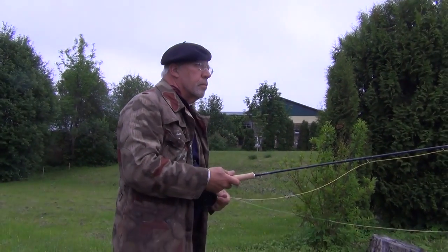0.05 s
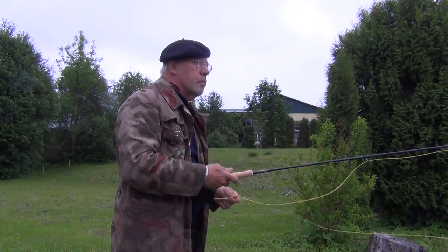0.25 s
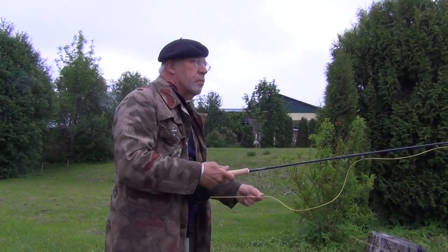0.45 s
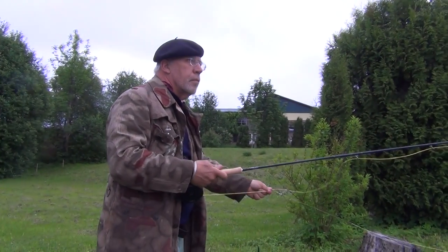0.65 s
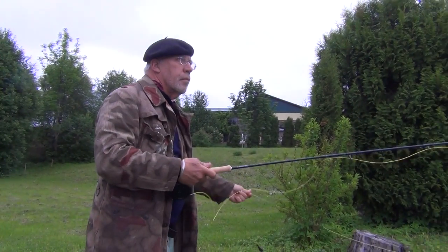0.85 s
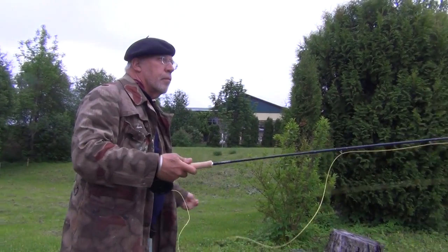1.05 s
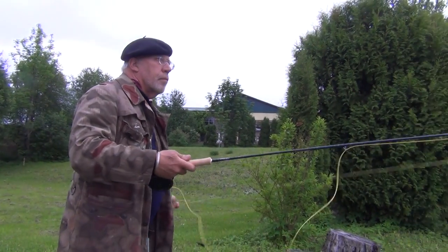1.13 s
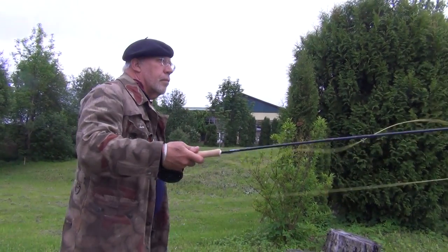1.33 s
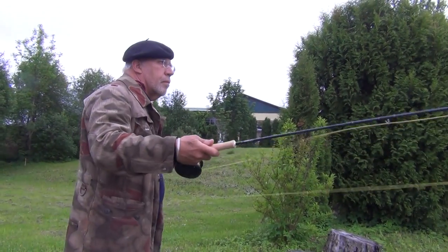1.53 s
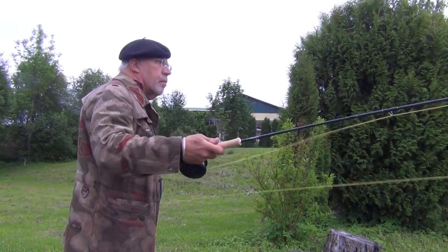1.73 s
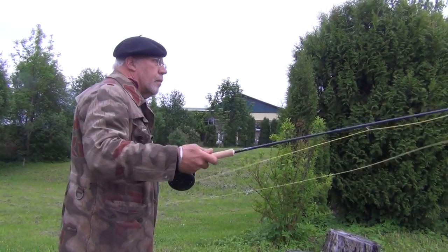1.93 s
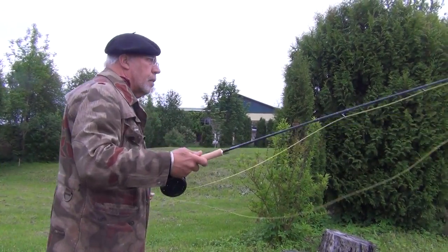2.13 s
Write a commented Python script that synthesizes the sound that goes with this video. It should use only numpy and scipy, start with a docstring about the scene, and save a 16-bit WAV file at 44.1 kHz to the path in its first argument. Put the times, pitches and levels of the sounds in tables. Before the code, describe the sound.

Fly reel clicker whirring in one fast bright burst, then line rub, knocks and single clicks

```python
"""Lawn: an angler pulls line off a click-and-pawl fly reel; the ratchet speeds up, buzzes and slows.
Reel: one pawl strike per tooth, rung through the pawl's colour, with friction drag and spool whirr; single
clicks follow, one faint and three clear. Line rub, sleeve and rattles are shaped grainy noise; bumps ring rod modes.
Behind: a small bird's gliding whistles, a far bird's wavering hoots, a faint diffuse echo and quiet air with a whine."""
import sys
import numpy as np
from scipy import signal
from scipy.fft import rfft, irfft
from scipy.io import wavfile
from scipy.ndimage import uniform_filter1d

SR = 44100
rng = np.random.default_rng(int(sys.argv[2]) if len(sys.argv) > 2 else 0)


def file_out(sig):
    """Save sig as 16-bit WAV at sys.argv[1]."""
    # one column per channel
    cols = np.atleast_2d(sig).T
    # limit, then scale
    lim = np.clip(cols, -1, 1)
    pcm = np.round(lim * 32767).astype(np.int16)
    wavfile.write(sys.argv[1], SR, pcm)


N = 97020

# spool speed: t/s, rate/(teeth/s)
SPOOL_SPEED = [(0.222, 46.5), (0.29, 94.2), (0.345, 119.9), (0.375, 120.2), (0.42, 169.6), (0.485, 193.9),
               (0.535, 176.5), (0.575, 185.6), (0.612, 158.2), (0.645, 176.9), (0.7, 147.7), (0.785, 79.5),
               (0.81, 39.2), (0.83, 19.8)]
# lone pawl clicks: t/s, relative level/dB
LONE_CLICKS = [(.8132, -18), (1.8382, 4), (1.8829, 3), (1.9336, 3)]
# pawl ring, spool paying out: f/Hz, relative level/dB
PAWL_OUT_COLOUR = [(300, -47.5), (3600, -35.5), (4700, -23.5), (6200, -11), (7400, -3.5), (8200, -9.5),
                   (8800, -5), (9600, -13), (11200, -8.5), (12100, 1), (12700, 4), (13700, 3), (14700, -24),
                   (15400, -7), (16400, -16.5), (17000, -39)]
# pawl ring, spool turning back: f/Hz, relative level/dB
PAWL_BACK_COLOUR = [(300, -27), (3000, -45), (5300, -11), (6200, -12.5), (7200, -0.5), (8200, -13),
                    (10500, -12.5), (12000, 3), (12600, -9), (13400, 4), (14600, -21), (15900, -7),
                    (18000, -33)]
# spool body: f/Hz, relative level/dB
WHIRR_COLOUR = [(150, -23), (500, -20), (950, -23), (1400, 1), (1800, -2.5), (2250, 7), (2600, -0.5),
                (3000, 3), (3700, -28), (4700, 9), (7000, -29.5)]
# quick line slide through the rings: t/s, level/dB
SLIDE_LEVEL = [(1.11, -70), (1.18, -64), (1.22, -47.5), (1.29, -46.5), (1.345, -47), (1.38, -46.5),
               (1.40, -57.5), (1.44, -54.5), (1.51, -43.5), (1.54, -61), (1.62, -65.5)]
# its spectrum: f/Hz, relative level/dB
SLIDE_SPECTRUM = [(880, -59), (1500, -27), (1560, -50), (1730, -32), (2430, -8), (3350, -11.5),
                  (4660, -1.5), (5990, -6), (7770, 1.5), (8950, -10), (12200, -7), (14800, -22),
                  (16500, -20.5)]
# gentle line slide: t/s, level/dB
CREEP_LEVEL = [(1.58, -66), (1.66, -61.5), (1.76, -56), (1.82, -57), (1.9, -58), (1.98, -68), (2.04, -73),
               (2.2, -74)]
# its spectrum: f/Hz, relative level/dB
CREEP_SPECTRUM = [(1180, -31), (2000, -2), (2410, -18), (2620, -11), (3990, -11.5), (11600, 4.5),
                  (17000, -20)]
# rattles and ticks of line and reel on the rod: t/s, level/dB, decay/s, brightness/(0-1)
RATTLE_EVENTS = [(1.13, -61, 0.0017, 0.8), (1.141, -53, .002, 1), (1.344, -39.5, 0.0057, 0.3),
                 (1.3675, -37, 0.007, 0.77), (1.4497, -29, 0.01, 0), (1.4675, -28.5, 0.0077, 0.1),
                 (1.486, -25.5, 0.003, 0.05), (1.497, -31.5, 0.0047, 0.33), (1.52, -39, 0.0042, 0.25),
                 (1.548, -42, .003, 0.57), (1.554, -42.5, 0.0036, 0.25), (1.572, -46.5, 0.0035, 0.4),
                 (1.585, -44.5, 0.0027, 0.8), (1.7445, -49, 0.00069, 1), (1.962, -46, .004, 0.73)]
# scrape spectrum: f/Hz, relative level/dB
SCRAPE_COLOUR = [(290, -56), (500, -21.5), (826, -19.5), (902, -10), (1400, -13.5), (1580, -18),
                 (1800, 0.5), (2120, -6.5), (2850, 1), (5880, -5.5), (8750, -1.5), (11600, -4.5),
                 (13000, -19), (16000, -8.5), (17000, -21)]
# ringing reel metal: f/Hz, relative level/dB, t60/s
METAL_MODES = [(1860, -31, .05), (2860, -29, .045), (3080, -32, .04), (4330, -30, .04), (8040, -27, .03)]
# hand bumps on the rod: t/s, relative level/dB
HAND_BUMPS = [(1.021, -18), (1.358, -11.5), (1.3605, 0.5), (1.3745, -12), (1.565, -24.5)]
# rod modes: f/Hz, relative level/dB, t60/s
ROD_MODES = [(123, -52, 0.11), (293, -32, 0.06), (341, -41, 0.11), (473, -42.5, 0.11), (500, -56, 0.14),
             (680, -75, 0.09), (880, -55, 0.18), (1240, -55, 0.12), (1800, -43, 0.048)]
# coat sleeve rustle: t/s, level/dB
SLEEVE_LEVEL = [(.55, -79), (.72, -70), (.8, -82), (1.02, -80), (1.07, -71), (1.16, -77), (1.33, -76),
                (1.40, -63), (1.47, -64), (1.53, -74), (1.7, -78)]
# its spectrum: f/Hz, relative level/dB
SLEEVE_SPECTRUM = [(30, -16), (90, 1.5), (170, -7), (280, 1.5), (550, -3), (900, -3.5), (1500, -19),
                   (4000, -32)]
# part reaching the two sides out of step: f/Hz, relative level/dB
WIDTH_GAIN = [(100, 8), (350, 3), (1000, -36), (3000, -1), (7000, -1.5), (9500, 5.5), (12000, -22)]
# small bird: t/s, length/s, opening f/Hz, held f/Hz, closing f/Hz, level/dB
CHIRP_NOTES = [(0.838, 0.058, 6300, 3480, 3070, -62), (0.928, 0.047, 3640, 3730, 3670, -63.5),
               (1.142, 0.065, 6900, 3725, 3790, -54.5), (1.505, 0.058, 3300, 3186, 3390, -54),
               (1.565, 0.0393, 3600, 3767, 3750, -51.5), (1.777, 0.077, 6600, 3693, 3850, -49.5),
               (1.85, .034, 3900, 4440, 3850, -55), (1.914, 0.025, 4750, 4400, 3930, -56),
               (2.108, 0.081, 6600, 4920, 3520, -52)]
# far bird: t/s, length/s, f/Hz, level/dB
HOOT_NOTES = [(1.62, .1, 690, -73), (1.80, .085, 705, -68), (1.86, .14, 925, -69),
              (1.882, .122, 528, -56.5), (2.14, .08, 690, -67)]
# outdoor air: f/Hz, relative level/dB
AIR_COLOUR = [(15, -28), (25, -5), (204, -8), (269, -10.5), (404, -8.5), (643, -8), (868, -9.5),
              (2380, -14.5), (3690, -12), (5120, -15.5), (14400, -21), (15700, -24), (17000, -47)]
# bright ticks: f/Hz, relative level/dB
TICK_COLOUR = [(1500, -27), (3000, -6), (7000, 0), (13000, -2), (16000, -1), (17000, -31)]

FIRST_TOOTH = .54  # starting phase, fraction of a tooth
RATCHET_DB, CLICK_SCATTER_DB, TOOTH_JITTER_S = 2.4, .4, .00003
REBOUND_S, REBOUND_DB = .0002204, -2.5
CHATTER_DB, CHATTER_S, FRAME_DB, FRAME_S = -15, .0009, -16, .006
DRAG_DB, DRAG_LAW, DRAG_FLUTTER_DB, DRAG_FLUTTER_HZ = -33.5, 1.1, 2.6, 1100
WHIRR_DB, WHIRR_GROWTH_DB_PER_S = -62.0206, 14.5  # at full speed, mean tooth time
SLIDE_RING_HZ, SLIDE_RISE_HZ_PER_S, SLIDE_RING_DB = 4460, 19000, -17  # level relative to the rub
RATTLE_RISE_S = .002
ROD_HUM_HZ, ROD_HUM_DB, ROD_HUM_T60_S = 178, -41, .38
CHIRP_DROP_S, CHIRP_FADE_S = .0105, .0057
HOOT_FADE_S, HOOT_WAVER = .015, .02  # waver: fraction of pitch, rms
LAWN_T60_S, LAWN_NEAR_DB, LAWN_FAR_DB = .63, -39, -7.5
AIR_DB, WHINE_HZ, WHINE_DB = -62.5, 15625, -72
SIDE_DB, TOP_HZ = -21, 17800
LEFT_RIGHT = np.array([[1], [-1]])


def undb(db):
    """dB to amplitude ratio."""
    return 10 ** (np.asarray(db) / 20)


def clock():
    """Time of every sample, s."""
    return np.arange(N) / SR


def unit(x):
    """Scale to rms 1."""
    return x / np.sqrt(np.mean(x ** 2))


def ring(x, response):
    """Pass a sound through an impulse response."""
    return signal.fftconvolve(x, response)[:N]


def colour(points, size=4096):
    """Minimum-phase response of unit energy with a (f/Hz, level/dB) spectrum."""
    hz, db = np.array(sorted(points)).T
    f = np.maximum(np.arange(size // 2 + 1) * SR / size, 1)
    cep = irfft(np.log(undb(np.interp(np.log(f), np.log(hz), db))))
    # folded cepstrum makes the response causal
    cep[1:size // 2] *= 2
    cep[size // 2 + 1:] = 0
    h = irfft(np.exp(rfft(cep)))
    return h / np.sqrt(np.sum(h ** 2))


def zero_phase(points, size=64):
    """Short symmetric response with a (f/Hz, level/dB) gain."""
    hz, db = np.array(sorted(points)).T
    gain = undb(np.interp(np.arange(size // 2 + 1) * SR / size, hz, db))
    return np.roll(irfft(gain), size // 2)[1:]


def modes(table):
    """Sum of exponentially decaying modes."""
    t = clock()[:N // 2]
    return sum(undb(db) * np.cos(2 * np.pi * hz * t) * np.exp(-np.log(1000) * t / t60)
               for hz, db, t60 in table)


def tail(decay_s):
    """Exponentially dying noise of unit energy."""
    t = clock()[:int(10 * decay_s * SR) + 2]
    h = rng.standard_normal(len(t)) * np.exp(-t / decay_s)
    return h / np.sqrt(np.sum(h ** 2))


def strikes(rows):
    """One impulse per (t/s, level/dB)."""
    out = np.zeros(N)
    for s, db in rows:
        out[int(np.clip(s * SR, 0, N - 1))] += undb(db)
    return out


def walk(rate_hz):
    """Smoothed random steps, rms 1."""
    k = int(SR / rate_hz)
    steps = np.repeat(rng.standard_normal(N // k + 1), k)
    return unit(uniform_filter1d(steps, k)[:N])


def grit(points, grain_db):
    """Friction: dense slips of uneven size with the given spectrum, rms 1."""
    slip_db = grain_db * np.minimum(rng.exponential(size=N), 2 * np.pi)
    slips = rng.standard_normal(N) * undb(slip_db)
    return unit(ring(slips, colour(points)))


def tone(hz):
    """Sine of rms 1 following a pitch curve."""
    return np.sqrt(2) * np.sin(2 * np.pi * np.cumsum(hz) / SR)


def note(u, length_s, fade_s):
    """Rounded attack, hold and release."""
    return np.sin(np.pi / 2 * np.clip(np.minimum(u, length_s - u) / fade_s, 0, 1))


def place(x, pan_db):
    """Lean a sound to the left (positive) or right."""
    return x * undb(LEFT_RIGHT * pan_db / 2)


def pawl(hits, points):
    """The pawl snaps onto a tooth, rebounds, chatters briefly and rings the reel frame."""
    t = clock()[:N // 20]
    power = ring(hits ** 2, np.exp(-2 * t / CHATTER_S)) * 2 / (CHATTER_S * SR)
    chatter = undb(CHATTER_DB) * np.sqrt(np.abs(power)) * rng.standard_normal(N)
    # all-pass rebound: spreads the snap in time, keeps its colour
    f = np.arange(N // 2 + 1) * SR / N
    lag, g = np.exp(-2j * np.pi * f * REBOUND_S), undb(REBOUND_DB)
    snap = irfft(rfft(hits) * (g + lag) / (1 + g * lag), N) + chatter
    frame = undb(FRAME_DB) * ring(snap, tail(FRAME_S))
    return ring(snap + frame, colour(points)) / 2


def ratchet(teeth_s):
    """One pawl strike per tooth, with slight scatter in time and level."""
    jitter, scatter = rng.standard_normal((2, len(teeth_s)))
    return strikes(zip(teeth_s + TOOTH_JITTER_S * jitter, RATCHET_DB + CLICK_SCATTER_DB * scatter))


def pawl_drag(turn, effort):
    """The pawl rubs over each tooth, lightens towards its tip and drags harder with speed."""
    contact = 1 - .6 * (turn % 1) ** 2
    flutter = undb(DRAG_FLUTTER_DB * walk(DRAG_FLUTTER_HZ))
    return undb(DRAG_DB) * contact * effort ** DRAG_LAW * flutter * grit(PAWL_OUT_COLOUR, grain_db=2.8)


def spool_whirr(hits, teeth_s, effort):
    """Tooth strikes and speed-driven noise ring the spool body; level grows with time and speed."""
    body = ring(hits, tail(.0058)) + .028 * effort * rng.standard_normal(N)
    level_db = WHIRR_DB + WHIRR_GROWTH_DB_PER_S * (clock() - teeth_s.mean())
    return undb(level_db) * np.sqrt(effort) * unit(ring(body, colour(WHIRR_COLOUR)))


def reel():
    """Spool speed, integrated, times the teeth and drives clicks, drag and whirr; lone clicks are added."""
    t = clock()
    speed = np.interp(t, *np.array(SPOOL_SPEED).T, left=0, right=0)
    effort = speed / speed.max()
    turn = FIRST_TOOTH + np.cumsum(speed) / SR  # in teeth
    teeth_s = t[1:][np.diff(np.floor(turn)) > 0]
    hits = ratchet(teeth_s)
    paying_out = pawl(hits, PAWL_OUT_COLOUR) + pawl_drag(turn, effort) + spool_whirr(hits, teeth_s, effort)
    return paying_out + pawl(strikes(LONE_CLICKS), PAWL_BACK_COLOUR)


def rub(curve, points, flutter_db):
    """Uneven friction of line in the rod rings, or of cloth."""
    db = np.interp(clock(), *np.array(curve).T, left=-np.inf)
    return undb(db + flutter_db * walk(120)) * grit(points, grain_db=4.2)


def singing_line():
    """A rough band of the rub that climbs for 0.13 s as the line speeds up, then holds its pitch."""
    t = clock()
    hz = SLIDE_RING_HZ + SLIDE_RISE_HZ_PER_S * np.clip(t - 1.2, 0, .13)
    db = np.interp(t, *np.array(SLIDE_LEVEL).T, left=-np.inf, right=-np.inf) + SLIDE_RING_DB
    return undb(db) * walk(1800) * tone(hz)


def sliding_line():
    """Line rubs the rod rings, first quickly and singing, then gently."""
    quick = rub(SLIDE_LEVEL, SLIDE_SPECTRUM, flutter_db=1.0)
    gentle = rub(CREEP_LEVEL, CREEP_SPECTRUM, flutter_db=1.2)
    return quick + gentle + singing_line()


def rattles():
    """Short friction bursts; brightness shifts power from scrapes, which ring the reel metal, to ticks."""
    t = clock()
    rows = np.array(RATTLE_EVENTS)
    power = []
    for s, db, decay_s, _ in rows:
        fall = np.maximum((s - t) / RATTLE_RISE_S, (t - s) / decay_s)
        power.append((undb(db) * np.exp(-fall)) ** 2)
    power = np.array(power)
    bright = np.clip(rows[:, 3], 0, 1)
    scrape = np.sqrt((1 - bright) @ power) * grit(SCRAPE_COLOUR, grain_db=1.5)
    ticks = np.sqrt(bright @ power) * grit(TICK_COLOUR, grain_db=5.0)
    return scrape + ring(scrape, modes(METAL_MODES)) / 10 + ticks


def bumps():
    """The soft hand knocks the rod, which rings low; one deep mode swells and hums on."""
    swell = 1 - np.exp(-clock()[:N // 2] / .0079)
    hum = modes([(ROD_HUM_HZ, ROD_HUM_DB, ROD_HUM_T60_S)]) * swell
    knock = ring(strikes(HAND_BUMPS), modes(ROD_MODES) + hum)
    return signal.sosfilt(signal.butter(2, 2200, fs=SR, output="sos"), knock)


def sleeve():
    """Soft, uneven cloth friction of the coat sleeve."""
    return rub(SLEEVE_LEVEL, SLEEVE_SPECTRUM, flutter_db=5.5)


def small_bird():
    """Whistles that glide to a held pitch and bend towards the end."""
    out = np.zeros(N)
    for s, length_s, opening, held, closing, db in CHIRP_NOTES:
        u = np.clip(clock() - s, 0, length_s)
        glide = (opening - held) * np.exp(-(u / CHIRP_DROP_S) ** 2)
        bend = (closing - held) * np.maximum(2 * u / length_s - 1, 0) ** 2
        hz = (held + glide + bend) * (1 + .0067 * walk(120))
        out += undb(db + 2.1 * walk(150)) * note(u, length_s, CHIRP_FADE_S) * tone(hz)
    return out


def far_bird():
    """Soft sine hoots with random waver in pitch and level."""
    out = np.zeros(N)
    for s, length_s, hz, db in HOOT_NOTES:
        wavering_hz = hz * (1 + HOOT_WAVER * walk(120))
        out += undb(db + 1.5 * walk(90)) * note(clock() - s, length_s, HOOT_FADE_S) * tone(wavering_hz)
    return out


def echo(near, far):
    """Faint diffuse return from the trees: exponentially decaying noise."""
    send = undb(LAWN_NEAR_DB) * near.mean(0) + undb(LAWN_FAR_DB) * far
    return ring(send, tail(LAWN_T60_S / np.log(1000)))


def air():
    """Quiet outdoor air, nearly the same on both sides, and a faint electronic whine."""
    mid, side = (undb(AIR_DB + .8 * walk(6)) * grit(AIR_COLOUR, grain_db=0) for _ in range(2))
    whine = undb(WHINE_DB) * np.sqrt(2) * np.sin(2 * np.pi * WHINE_HZ * clock())
    return mid + whine + undb(-17.5) * side * LEFT_RIGHT


def stereo_width(near):
    """Quarter-cycle-shifted copy of the near sound, opposite in sign on the two sides."""
    shifted = signal.hilbert(near.mean(0)).imag
    return undb(SIDE_DB) * np.convolve(shifted, zero_phase(WIDTH_GAIN), "same") * LEFT_RIGHT


def scene():
    """Tackle close by, birds far off, echo and air behind."""
    near = reel() + place(sliding_line(), pan_db=1.5)
    near = near + place(rattles(), pan_db=-2.0) + place(bumps() + sleeve(), pan_db=2.0)
    far = small_bird() + far_bird()
    return near + stereo_width(near) + far + echo(near, far) + air()


def record(dry):
    """Steep low-pass cuts the very top."""
    return signal.sosfilt(signal.ellip(10, .1, 80, TOP_HZ, fs=SR, output="sos"), dry)


dry = scene()
out = record(dry)
file_out(out)
```